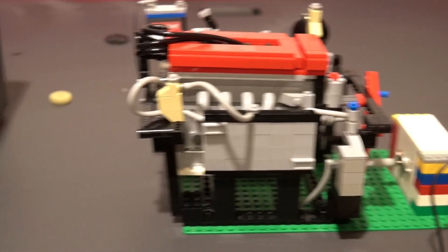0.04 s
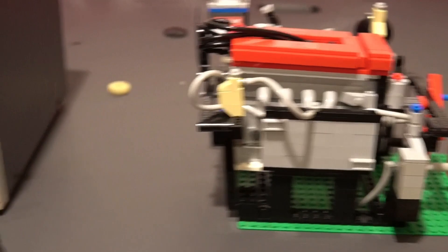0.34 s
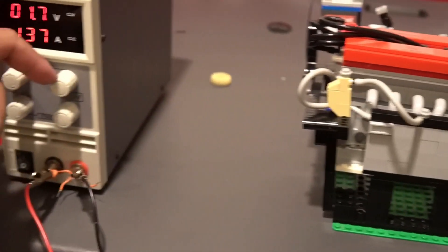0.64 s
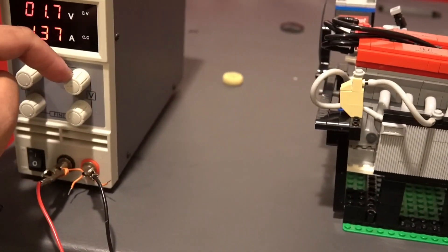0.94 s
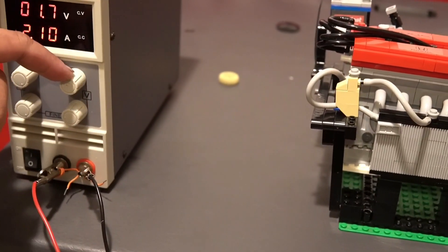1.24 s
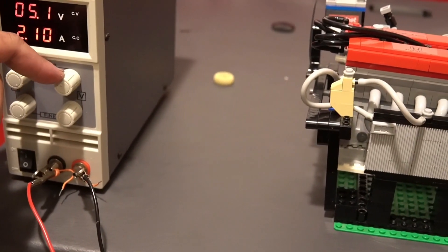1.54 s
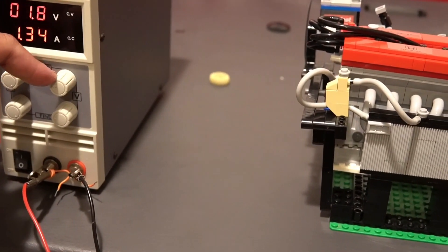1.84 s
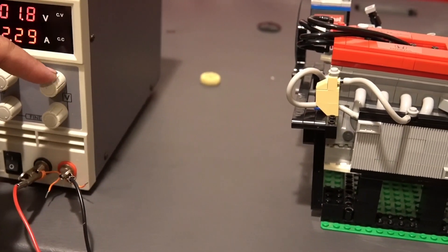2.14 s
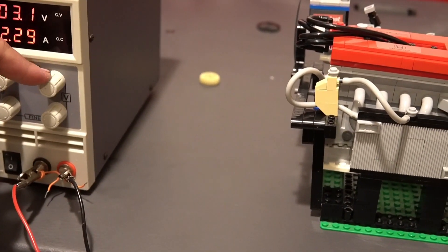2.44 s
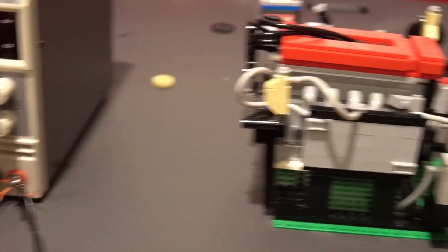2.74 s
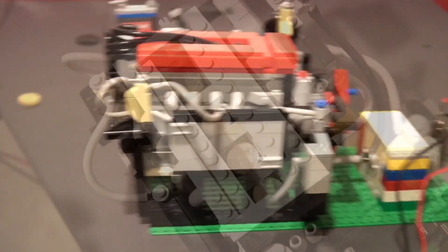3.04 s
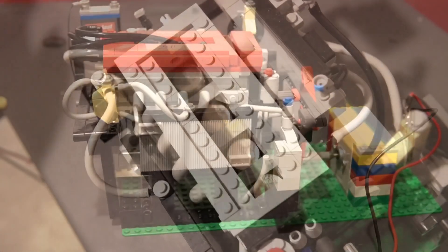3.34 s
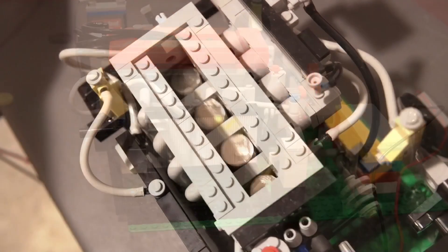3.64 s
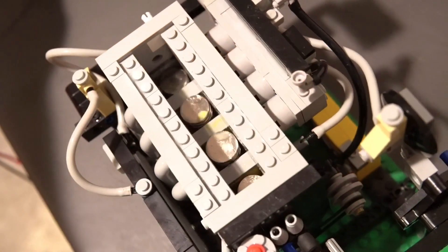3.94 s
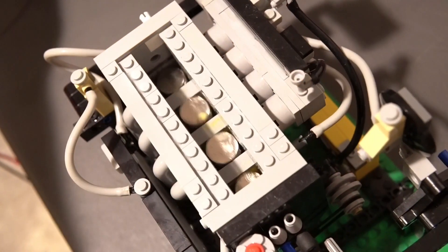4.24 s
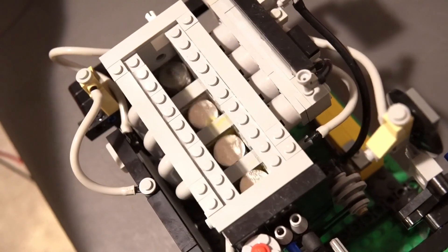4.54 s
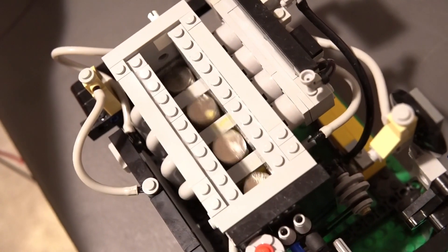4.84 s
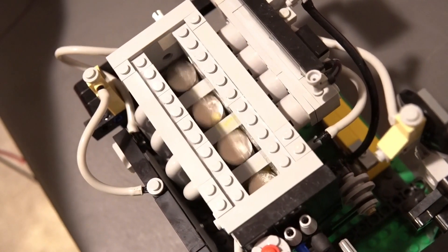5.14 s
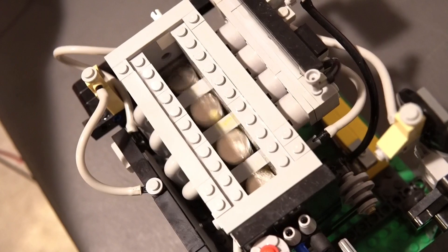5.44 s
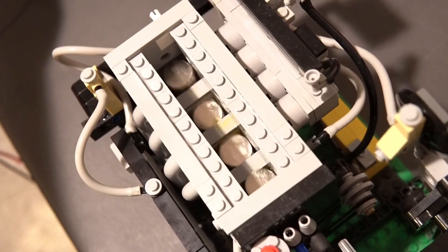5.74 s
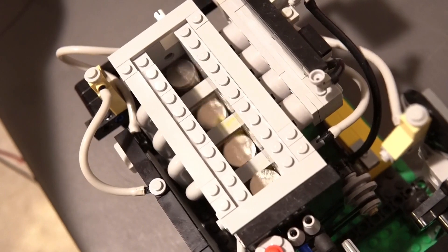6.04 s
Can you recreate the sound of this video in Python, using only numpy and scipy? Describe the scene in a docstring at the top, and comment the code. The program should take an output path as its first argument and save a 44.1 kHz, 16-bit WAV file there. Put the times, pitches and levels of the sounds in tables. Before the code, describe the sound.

A small model engine of plastic bricks with metal pistons ticks and clacks, spun by an electric motor. It speeds into a loud rattle, slows, revs again more gently and stalls. After a brief pause the ticking fades back in and builds into one longer rev, with dense knocking and a rising hum, then begins to ease. It is heard close up on a table in a quiet room.

```python
"""A model four-cylinder engine of plastic bricks with metal pistons clatters on a table, spun by a motor.
Once per crank turn its slack linkage catches and slaps; pistons knock and gears tick. These impacts
excite the resonant modes of the block, while the electric motor's unbalance forces the baseplate to hum.
Pace and force rise with motor speed. The engine is heard from the side for two revs and a stall,
then fades in from above the open block for one long rev, over faint room air."""
import sys
import numpy as np
from scipy import signal
from scipy.fft import rfft, irfft
from scipy.io import wavfile
from scipy.ndimage import uniform_filter1d

SR = 44100
rng = np.random.default_rng(int(sys.argv[2]) if len(sys.argv) > 2 else 0)


def store_pcm(level_fs):
    """Save levels as 16-bit WAV."""
    pcm = np.round(np.clip(level_fs, -1, 1) * 32767).astype(np.int16)
    wavfile.write(sys.argv[1], SR, np.atleast_2d(pcm).T)


N = 267687
TIME = np.arange(N) / SR
SIDE_VIEW_ENDS_S = 2.7
VIEW_CUT = int(SIDE_VIEW_ENDS_S * SR)
IDLE_SPEED, FULL_SPEED = 33, 100  # motor turns per second, like every speed here
GEAR_RATIO = 5  # motor turns per crank turn
PLACES = 8  # points of impact on the block, each with its own ring

# the linkage taking up its slack: (time [s], relative level [dB])
CATCH_BLOWS = [(.0418, -12), (.2089, -14.5), (.3775, -13.5), (.5457, -15), (.7138, -15.5), (.8809, -12.5),
               (1.0166, -9), (1.1094, -1), (1.1802, -9), (1.2391, 3.5), (1.2905, -1), (1.341, 1),
               (1.3892, 0), (1.4411, 1.5), (1.4955, -1.5), (1.5569, -4), (1.6292, -8), (1.7245, -8),
               (1.867, -17), (2.0088, -5.5), (2.0996, -3), (2.1774, -1), (2.2523, -7), (2.3356, -8),
               (2.4753, -19), (2.906, -15), (3.0416, -15), (3.18, -15), (3.317, -14), (3.455, -15),
               (3.593, -17), (3.7295, -17), (3.867, -16), (4.004, -17), (4.141, -16), (4.2775, -15),
               (4.414, -17), (4.548, -16), (4.67, -15), (4.7696, -10), (4.8499, -13)]


def linkage_catches(speed):
    """Backlash: once per crank turn the slack closes in an impact. One click train per place."""
    return share_out(chatter(speed, *np.transpose(CATCH_BLOWS), bounce_db=-6, crank_turns=.06))


# spectrum of a catch in each view: (frequency [Hz], gain [dB])
SIDE_SNAP_SPECTRUM = [(300, -4.5), (800, -5.5), (1500, -6.5), (2400, -2), (3700, -4.5), (4500, -1),
                      (6000, -11.5), (8000, -15), (14000, -16.5)]
ABOVE_SNAP_SPECTRUM = [(300, -23), (800, -41), (1500, -8), (2400, -2), (3300, 0.5), (4800, 2.5),
                       (6000, -6.5), (8000, -8), (12300, -2), (15000, -14)]
# modes of the thin brick walls, heard from the side: (frequency [Hz], bandwidth [Hz], gain [dB])
WALL_MODES = [(4490, 230, 3), (5000, 220, 6.5)]


def snap(catches, place):
    """Impulsive excitation: a catch is a bright snap that rings the thin brick walls."""
    side = colour(catches[:VIEW_CUT], SIDE_SNAP_SPECTRUM, detuned(WALL_MODES, place))
    above = colour(catches[VIEW_CUT:], ABOVE_SNAP_SPECTRUM)
    return np.r_[side, above]


# the linkage slapping home just after a catch, heard from above: (time [s], relative level [dB])
SLAP_BLOWS = [(2.916, -10), (3.053, -5), (3.1878, -8), (3.327, -24), (3.4659, -6), (3.6033, -7),
              (3.738, -7.5), (3.8765, -4), (4.018, -17), (4.15, -6), (4.2879, -8.5), (4.4232, -6.5),
              (4.5592, -6.5), (4.676, -6.5)]
# its rattle after each catch: (phase [turns], scatter [turns], idle level [dB], full-speed level [dB])
SIDE_RATTLE_CYCLE = [(.075, .012, -21, -14), (.12, .01, -20, -15)]
ABOVE_RATTLE_CYCLE = [(.02, .004, -28, -11), (.1, .006, -18, -12)]
# spectrum of the hollow clack: (frequency [Hz], gain [dB])
SLAP_SPECTRUM = [(300, -9), (800, -5), (1300, -2), (1700, 0), (2450, 2), (3100, -3.5), (4000, -10),
                 (5000, -3), (6000, -7.5), (7000, -14.5), (8200, -6.5), (10000, -15.5), (14000, -22)]


def linkage_slaps(speed):
    """Secondary impacts: after a catch the linkage slaps home and rattles on. One train per place."""
    slaps = chatter(speed, *np.transpose(SLAP_BLOWS), bounce_db=-18, crank_turns=.076)
    cycle = every_turn(speed, SIDE_RATTLE_CYCLE, ABOVE_RATTLE_CYCLE, spread_db=5)
    rattles = chatter(speed, *cycle, bounce_db=-4.5, crank_turns=.07)
    return np.array([colour(train, SLAP_SPECTRUM) for train in share_out(slaps, rattles)])


def chatter(speed, times, db, bounce_db, crank_turns, bounces=5):
    """Rebound: each blow bounces on for part of a crank turn. Returns times and levels of all contacts."""
    rate = np.maximum(np.interp(times, TIME, speed), IDLE_SPEED)[:, None]
    lateness = (np.arange(bounces) + rng.random((len(times), bounces))) / bounces
    bounce_times = times[:, None] + lateness * crank_turns * GEAR_RATIO / rate
    # bounces lose 4.5 dB per doubling of speed, and the late ones die away
    start_db = db[:, None] + bounce_db - 4.5 * np.log2(rate / IDLE_SPEED)
    levels = start_db - 8 * lateness ** 3 + 2.5 * rng.standard_normal(lateness.shape)
    return np.r_[times, bounce_times.ravel()], np.r_[db, levels.ravel()]


# hard knocks of pistons and loose bricks: (time [s], relative level [dB])
HARD_KNOCKS = [(0.1215, -19), (0.1341, -15), (.177, -22), (0.2229, -14), (0.3026, -15.5), (0.3516, -31),
               (0.392, -10), (.412, -13.5), (0.4578, -23), (0.5623, -8.5), (0.4692, -12.5), (.6374, -13),
               (0.7316, -16), (0.7763, -21), (0.8063, -15), (0.902, -9.5), (0.9633, -19), (.9887, -34),
               (1.068, -10), (1.0856, -11), (1.161, -4), (1.225, -12), (1.2663, -15), (1.3153, -1.5),
               (1.692, -4.5), (1.8017, -9.5), (1.8772, 1), (1.904, -7), (1.954, -13.5), (2.0517, -11),
               (2.1549, -24), (2.2172, -15), (2.2934, -6), (2.3936, -9.5), (2.408, -8.5), (2.488, -12),
               (2.497, -18), (2.525, -28), (2.542, -28), (2.9801, -12), (3.024, -20), (3.0867, -11),
               (3.1183, -12.5), (3.1604, -24), (3.2425, -20), (3.257, -16), (3.3049, -31), (3.352, -14),
               (3.3927, -12), (3.425, -15), (3.5289, -11.5), (3.5645, -18), (3.6654, -25), (3.7, -16.5),
               (3.8043, -9.5), (3.8457, -18.5), (3.943, -16), (4.0356, -12.5), (4.079, -27),
               (4.0966, -16.5), (4.2155, -18), (4.248, -15.5), (4.354, -23), (4.393, -23), (4.4877, -14),
               (4.5387, -18), (4.6127, -18), (4.634, -11), (4.7237, -16), (4.7697, -5), (4.8145, -14),
               (4.8519, -19), (4.9027, -23), (4.923, -17), (4.9408, -8), (4.9714, -6), (4.9871, -15),
               (5.036, -12), (5.0484, -9.5), (5.0624, -4), (5.099, -0.5), (5.1414, -8), (5.191, -22),
               (5.2046, -8), (5.24, -9), (5.2518, -1), (5.2844, -1), (5.298, -7), (5.3321, -3),
               (5.3542, -3), (5.377, -9), (5.401, -5), (5.422, -4.5), (5.45, -5), (5.467, -5), (5.4763, -6),
               (5.5007, -4), (5.5118, -8), (5.5217, 0), (5.5567, -11), (5.5703, -7.5), (5.6213, -9),
               (5.631, -10), (5.6561, -4), (5.7056, -3), (5.76, -13), (5.778, -10.5), (5.8155, -8),
               (5.8349, -4), (5.8788, -16), (5.897, -4.5), (5.9415, -11), (5.9591, -3), (5.9993, -5)]
# light piston and valve knocks: (phase [turns], scatter [turns], idle level [dB], full-speed level [dB])
SIDE_KNOCK_CYCLE = [(0.199, .025, -27, -4.5), (.29, 0.033, -27, -8), (.409, 0.049, -34.5, -9),
                    (0.539, 0.009, -16, -8), (.74, .025, -26, -7.5), (0.853, 0.06, -35, -11)]
ABOVE_KNOCK_CYCLE = [(.24, .02, -16, -3), (.54, .0076, -15, -11), (.71, .025, -19, -5.5),
                     (.86, 0.027, -50, -5.5)]
# a blow too short to move the low modes much: (frequency [Hz], gain [dB])
KNOCK_SPECTRUM = [(300, -15.5), (800, -14), (1500, -9.5), (2400, -4.5), (4400, -5), (8000, -16),
                  (14000, -8.5)]


def pistons(speed, bounce_s=.003, bounce_db=-5.5):
    """Impact and rebound: each knock bounces once and is brighter at speed. One train per place."""
    hard = np.transpose(HARD_KNOCKS)
    light = every_turn(speed, SIDE_KNOCK_CYCLE, ABOVE_KNOCK_CYCLE, spread_db=1)
    times, db = np.hstack([hard, light])
    delay_scatter, scatter_db = rng.standard_normal((1000, 2))[:len(times)].T
    bounces = times + bounce_s * np.exp(.4 * delay_scatter), db + bounce_db + scatter_db
    trains = share_out(hard, (times, db), bounces)  # a hard knock lands as two simultaneous contacts
    hardness = np.interp(speed, [36, 85], [.02, .95])
    return np.array([colour(contact(train, hardness), KNOCK_SPECTRUM) for train in trains])


def gears(speed):
    """Random impulse trains: teeth tick gently when slow, hard and unevenly at speed. One per place."""
    pace = np.interp(speed, [32, 100], [0, 1])
    # at speed the ticks bunch on one side of each motor turn
    bunching = 1 + .7 * pace * np.cos(2 * np.pi * np.cumsum(speed) / SR)
    ticks_per_turn = 1.6 - .6 * pace  # fewer as the teeth skip
    tick_chance = ticks_per_turn * speed * bunching / SR
    gain_db, spread_db, hardness = -11.5 + 4.5 * pace, 3 + 3 * pace, .02 + .93 * pace
    trains = []
    for _ in range(PLACES):
        hits = np.flatnonzero(rng.random(N) < tick_chance)
        heights = from_db(spread_db[hits] * np.clip(rng.standard_normal(len(hits)), -2, 2))
        heights *= rng.choice([-1, 1], len(hits))
        # dividing out the running power makes the level independent of the tick rate
        power = uniform_filter1d(heights ** 2, size=100) * ticks_per_turn[hits] * (speed[hits] + 1) / SR
        ticks = clicks(hits / SR, heights / np.sqrt(power) * from_db(gain_db[hits]))
        trains.append(contact(ticks, hardness))
    return np.array(trains)


# the treble that a gentle contact loses: (frequency [Hz], gain [dB])
GENTLE_SPECTRUM = [(1200, 2), (2500, -1.5), (3500, -7), (5000, -5), (6500, -6), (10000, -9.5),
                   (14000, -12.5)]


def contact(impulses, hardness):
    """Contact time sets bandwidth: harder contacts (hardness 0 to 1) are shorter and so brighter."""
    return hardness * impulses + colour((1 - hardness) * impulses, GENTLE_SPECTRUM)


def every_turn(speed, side_cycle, above_cycle, spread_db, turn_count=44):
    """Cyclic excitation: the crank repeats its contacts, harder at speed. Returns times and levels."""
    crank = np.cumsum(speed) / SR / GEAR_RATIO
    # phase is counted in crank turns from the first catch of each view
    views = [(side_cycle, .0416, 0, SIDE_VIEW_ENDS_S), (above_cycle, 2.906, SIDE_VIEW_ENDS_S, TIME[-1])]
    rows = []
    for cycle, first_catch_s, start_s, end_s in views:
        turns = np.interp(first_catch_s, TIME, crank) + np.arange(-1, turn_count)
        for phase, scatter, idle_db, full_db in cycle:
            late, strong = np.clip(rng.standard_normal((2, len(turns))), -2, 2)
            times = np.interp(turns + phase + scatter * late, crank, TIME)
            rate = np.maximum(np.interp(times, TIME, speed), 1)
            pace = np.log(rate / IDLE_SPEED) / np.log(FULL_SPEED / IDLE_SPEED)
            db = idle_db + pace * (full_db - idle_db) + spread_db * strong
            rows.append(np.c_[times, db][(times > start_s) & (times < end_s)])
    return np.concatenate(rows).T


def share_out(*groups):
    """Distributed excitation: contacts (times, levels) land on random places. One click train for each."""
    times, db = np.hstack(groups)
    landing = rng.integers(0, PLACES, 4000)[:len(times)]
    return [clicks(times, from_db(db) * (landing == place)) for place in range(PLACES)]


# broad response of the block in each view: (frequency [Hz], relative gain [dB])
SIDE_BLOCK_SPECTRUM = [(40, -25.5), (140, -21.5), (200, -20.5), (450, -15.5), (600, -9), (930, -12),
                       (1500, -6.5), (2750, -2.5), (3700, -9.5), (5000, -12.5), (5600, -11.5), (9000, -16),
                       (15000, -28.5)]
ABOVE_BLOCK_SPECTRUM = [(40, -23.5), (110, -9), (200, -14), (340, -3), (470, -15.5), (560, -13),
                        (1150, -14.5), (1600, -3.5), (2100, -6), (2750, -1.5), (3250, -8), (4900, -8.5),
                        (5500, -13), (9000, -14), (12500, -20.5), (15500, -26)]
# its resonances: (frequency [Hz], bandwidth [Hz], gain [dB])
SIDE_BLOCK_MODES = [(549, 21, 8.4), (657, 26, 9.6), (873, 14, 10), (1098, 110, 8.3), (1515, 50, 3),
                    (1620, 120, 7.8), (1845, 62, 5), (1976, 39, 6.4), (2120, 30, 4), (2160, 16, 4),
                    (2453, 33, 4.4), (2630, 34, 3.6), (4470, 200, 4), (4910, 200, 8.1), (6400, 470, 2.9),
                    (8120, 250, 2.1)]
ABOVE_BLOCK_MODES = [(650, 11, 4.2), (872, 14, 8.3), (1008, 36, 7.9), (1682, 22, 2.7), (1980, 45, 4.7),
                     (2114, 60, 5.5), (2357, 70, 1), (2431, 84, 9.6), (3460, 130, 3.5), (4010, 370, 3),
                     (4960, 140, 3), (6420, 490, 3.2), (7400, 780, 1.9)]
# its stereo balance: (frequency [Hz], left minus right [dB])
SIDE_BALANCE = [(200, 0), (1000, -1.5), (2200, -4), (4500, -2.5), (12000, 0)]
ABOVE_BALANCE = [(200, -0.5), (1000, -0.5), (2200, -1.5), (4500, 1.2), (12000, 3)]


def block(catches, clatter):
    """Linear superposition: the force at each place is convolved with that place's impulse response."""
    sound = np.zeros((2, N))
    for place in range(PLACES):
        force = snap(catches[place], place) + clatter[place]
        side = strike_response(SIDE_BLOCK_SPECTRUM, detuned(SIDE_BLOCK_MODES, place), SIDE_BALANCE,
                               direct_db=-5.5, crack_t60=.0027, ring_t60=.046, ring_db=-6,
                               room_t60=.2, room_db=-14.5)
        above = strike_response(ABOVE_BLOCK_SPECTRUM, detuned(ABOVE_BLOCK_MODES, place), ABOVE_BALANCE,
                                direct_db=-4, crack_t60=.0022, ring_t60=.03, ring_db=-2.5,
                                room_t60=.36, room_db=-25.5)
        for view, response in [(slice(VIEW_CUT), side), (slice(VIEW_CUT, N), above)]:
            part = force[view]
            sound[:, view] += signal.oaconvolve([part], response, axes=1)[:, :len(part)]
    return sound


def strike_response(spectrum, modes, balance, direct_db, crack_t60, ring_t60, ring_db, room_t60, room_db):
    """Impulse response: a direct click, then exponential decay of crack, brick modes and room."""
    t = TIME[:16384]
    crack = from_db(-60 * t / crack_t60)
    ring = from_db(ring_db - 60 * t / ring_t60)
    room = from_db(room_db - 60 * t / room_t60)
    decay = np.sqrt(crack ** 2 + ring ** 2 + room ** 2)
    scattered = np.array([whiten(decay * white) for white in rng.standard_normal((2, len(t)))])
    scattered /= np.sqrt(np.sum(scattered[0] ** 2))
    direct = from_db(direct_db) * (t == 0)
    mid = colour(scattered[0] + direct, spectrum, modes)
    difference = colour(scattered[1], spectrum, modes)
    return pan_bands(stereo(mid, difference), balance) / np.sqrt(np.sum(mid ** 2))


def detuned(modes, place, step=.004, spread_db=1.4):
    """Modal variation: at each place the resonances are slightly shifted, some stronger, some weaker."""
    shift = 1 + step * (place - (PLACES - 1) / 2)
    return [(hz * shift, width, db + spread_db * rng.standard_normal()) for hz, width, db in modes]


# response of the baseplate in each view: (frequency [Hz], relative gain [dB])
SIDE_PLATE_SPECTRUM = [(30, -21.5), (110, -8.5), (160, -1.5), (205, 3), (235, -3.5), (275, 7.5),
                       (330, -8.5), (377, 6), (402, 6), (425, -9.5), (520, -3), (650, -5), (1000, -32)]
ABOVE_PLATE_SPECTRUM = [(35, -44), (70, -20), (110, -23.5), (160, -14), (220, -10), (265, -12), (295, -3.5),
                        (315, 2.5), (338, -2.5), (358, -6), (385, -1), (402, -5), (422, -20), (447, -9.5),
                        (475, -18), (550, -13), (620, -19), (670, -14), (720, -19.5), (900, -12),
                        (1150, -52)]


def baseplate(speed, hum_db, shake_db):
    """Forced vibration: the motor's unbalance shakes the plate once a turn and makes it hum."""
    angle = 2 * np.pi * np.cumsum(speed) / SR
    side = hum(speed, angle, SIDE_PLATE_SPECTRUM, waver=.087, slow_rough_db=0, fast_rough_db=4.5)
    above = hum(speed, angle, ABOVE_PLATE_SPECTRUM, waver=.11, slow_rough_db=-4.5, fast_rough_db=-10)
    shake = np.sqrt(2) * np.sin(angle) * (1 + by_view(.5, .14) * drift(40))
    return from_db(hum_db) * by_view(side, above) + from_db(shake_db) * shake


# harmonics of the hum: (order [multiple of the motor's rate], relative level [dB])
HUM_HARMONICS = [(2, -5), (3, -5), (4, -1), (5, -5.5), (6, -4), (7, -5), (8, -2), (9, -7.5), (10, -3.5),
                 (11, -7)]


def hum(speed, angle, plate, waver, slow_rough_db, fast_rough_db):
    """Resonance: harmonics stand out as they cross the plate's peaks; loose bricks add rough noise."""
    tone = 0
    for order, db in HUM_HARMONICS:
        # a quadratic phase lag keeps the buzz even through the turn
        phase = order * angle - np.pi * (order / 2) ** 2 + waver * drift(25)
        amplitude = from_db(db + at_hz(plate, order * speed)) * (1 + waver * drift(25))
        tone = tone + amplitude * np.sin(phase)
    tone /= np.sqrt(uniform_filter1d(tone ** 2, size=6000) + 1e-9)  # hold the power steady
    roughness = from_db(np.interp(speed, [35, 90], [slow_rough_db, fast_rough_db]))
    noise = rms_one(colour(rng.standard_normal(N), plate))
    return (tone + roughness * noise) / np.sqrt(1 + roughness ** 2)


# spectrum of the quiet room: (frequency [Hz], relative level [dB])
ROOM_SPECTRUM = [(25, 4.5), (65, 1), (330, -2), (600, -7.5), (1200, -9), (2900, -9.5), (3230, 0),
                 (3700, -15), (15000, -25.5)]


def room_tone(level_db):
    """Stationary noise: faint steady air."""
    mid, difference = (colour(white, ROOM_SPECTRUM) for white in rng.standard_normal((2, N)))
    return from_db(level_db) * rms_one(stereo(mid, difference))


# stereo width: (frequency [Hz], gain of the difference signal [dB])
STEREO_WIDTH = [(100, -30), (500, -17), (1000, -18.5), (2000, -11), (4000, -5), (8000, -1.5), (14000, 0)]


def stereo(mid, difference):
    """Coherence falls with frequency: left and right agree in the bass and differ in the treble."""
    difference = colour(difference, STEREO_WIDTH)
    return np.array([mid + difference, mid - difference])


def pan_bands(pair, balance):
    """Level difference: each band is a little louder on the nearer side."""
    return np.array([colour(channel, [(hz, sign * db / 2) for hz, db in balance])
                     for channel, sign in zip(pair, (1, -1))])


def colour(x, spectrum, modes=(), size=4096):
    """Minimum-phase filtering by a dB curve with resonance peaks."""
    hz = np.fft.rfftfreq(size, 1 / SR)
    peaks_db = sum(db / (1 + (2 * (hz - centre) / width) ** 2) for centre, width, db in modes)
    cepstrum = irfft((at_hz(spectrum, hz) + peaks_db) * np.log(10) / 20)
    # folding the cepstrum onto positive time makes the filter causal
    cepstrum[1:size // 2] *= 2
    cepstrum[size // 2 + 1:] = 0
    return signal.oaconvolve(x, irfft(np.exp(rfft(cepstrum))))[:len(x)]


def whiten(x):
    """Spectral whitening: evens out the broad spectrum and keeps the narrow modes."""
    bins = rfft(x, 2 * len(x))
    return irfft(bins / np.sqrt(uniform_filter1d(abs(bins) ** 2, size=340)))[:len(x)]


def drift(rate_hz):
    """Slow random modulation with unit RMS."""
    knots = rng.standard_normal(4000)
    return rms_one(np.interp(TIME * rate_hz, np.arange(len(knots)), knots))


def clicks(times, heights):
    """Ideal impulses at the given times."""
    return np.bincount(np.clip(np.round(times * SR).astype(int), 0, N - 1), heights, N)


def at_hz(spectrum, hz):
    """Interpolation on a log-frequency axis."""
    knots_hz, db = np.transpose(spectrum)
    return np.interp(np.log(np.maximum(hz, 1)), np.log(knots_hz), db)


def look_up(table, x):
    """Linear interpolation of each later column against the first."""
    knots, *columns = np.transpose(table)
    return np.array([np.interp(x, knots, column) for column in columns])


def by_view(side, above):
    """Listening position: first from the side, then from above."""
    return np.where(TIME < SIDE_VIEW_ENDS_S, side, above)


def from_db(db):
    return 10 ** (np.asarray(db) / 20)


def rms_one(x):
    return x / np.sqrt(np.mean(x ** 2) + 1e-20)


# the motor's revs in each view: (time [s], speed [turns/s])
SIDE_REVS = [(.83, 29.72), (.97, 36.49), (1.12, 64.34), (1.25, 95.94), (1.35, 102.23), (1.47, 92.74),
             (1.62, 63.54), (1.76, 37.2), (1.9, 27.04), (2.08, 60.14), (2.2, 68.23), (2.31, 59.74),
             (2.42, 29.98), (2.53, 20.5), (2.56, 0)]
ABOVE_REVS = [(4.48, 36.44), (4.65, 43.31), (4.9, 69.95), (5.2, 103.44), (5.3, 109.9), (5.4, 112.11),
              (5.52, 109.25), (5.8, 87.12), (6.07, 69.21)]
# running gains: (speed [turns/s], gear rattle [dB], plate hum [dB], shake at the motor's rate [dB])
SIDE_GAINS = [(0, -93.5, -86, -100), (20.5, -46.5, -69, -94), (31, -49.5, -64.5, -100),
              (39.3, -43, -60.5, -84), (64.7, -37, -55.5, -66), (103, -35, -48, -52.5)]
ABOVE_GAINS = [(36, -44.5, -50.5, -70), (41.24, -44, -47.5, -65), (57, -36, -53, -55.5),
               (74.3, -35.5, -44, -54.5), (116, -31.5, -37.5, -43)]


def scene(fade_start_s=2.817, fade_length_s=1.15):
    """Superposition: the struck block and the humming plate share one motor speed, over room air."""
    speed, = by_view(look_up(SIDE_REVS, TIME), look_up(ABOVE_REVS, TIME))
    gear_db, hum_db, shake_db = by_view(look_up(SIDE_GAINS, speed), look_up(ABOVE_GAINS, speed))
    catches = linkage_catches(speed)
    clatter = linkage_slaps(speed) + pistons(speed) + from_db(gear_db) * gears(speed)
    engine = block(catches, clatter) + baseplate(speed, hum_db, shake_db)
    fade = by_view(1.0, np.clip((TIME - fade_start_s) / fade_length_s, 0, 1))
    return fade * engine + room_tone(level_db=-76.5)


def record(dry):
    """Band limiting: a steep elliptic low-pass removes the highest treble."""
    cutoff_hz = 15900
    return signal.sosfilt(signal.ellip(10, .1, 70, cutoff_hz, fs=SR, output="sos"), dry)


dry = scene()
out = record(dry)
store_pcm(out)
```